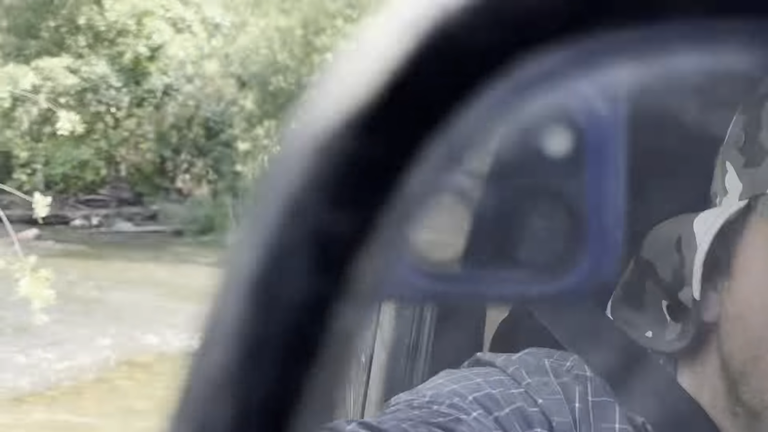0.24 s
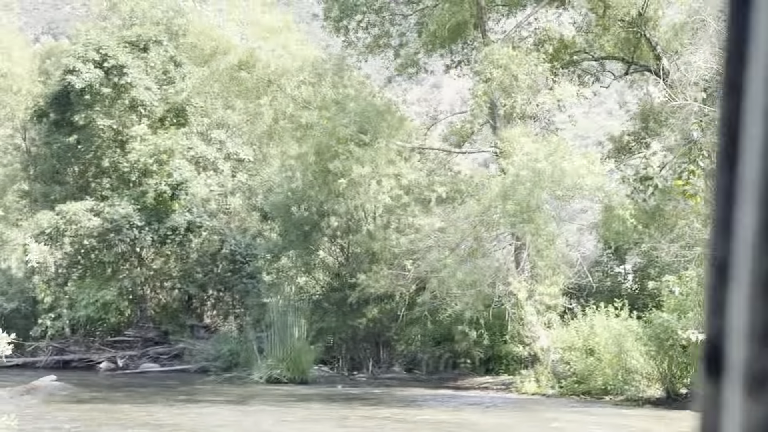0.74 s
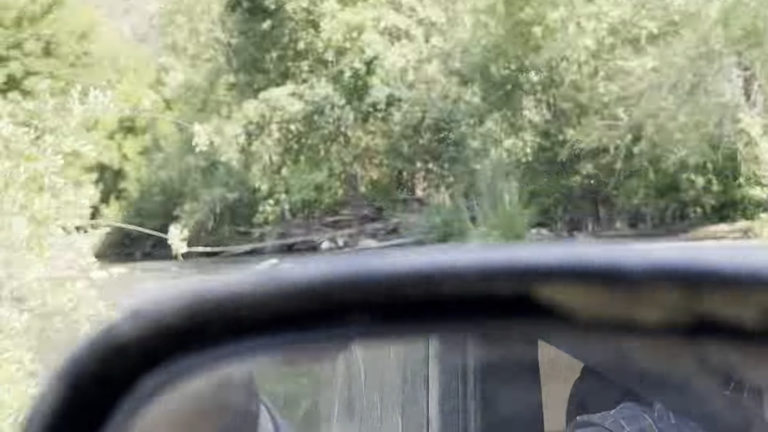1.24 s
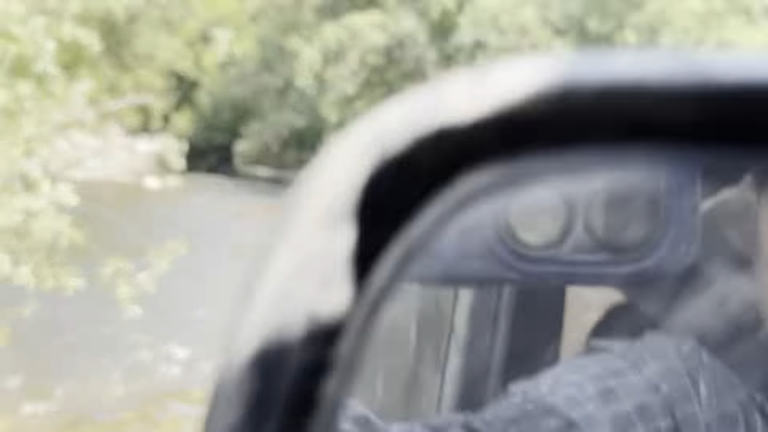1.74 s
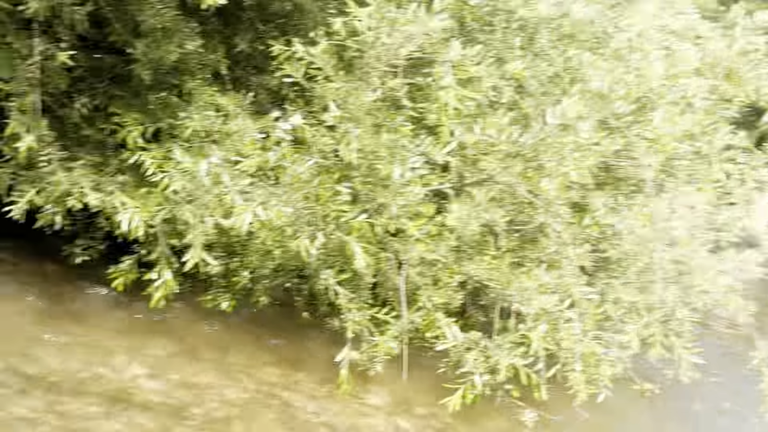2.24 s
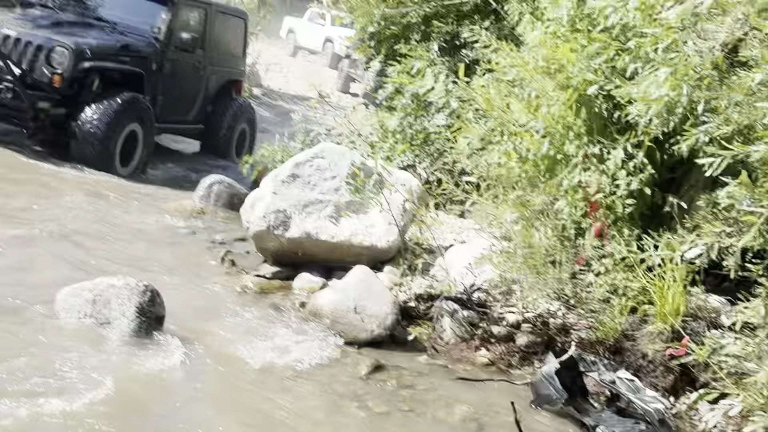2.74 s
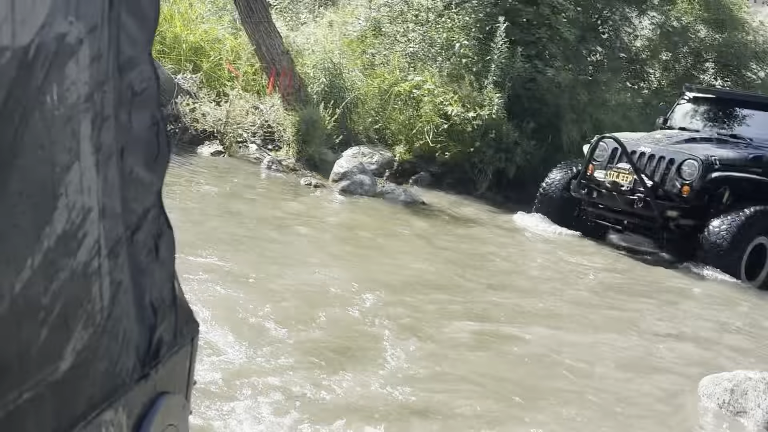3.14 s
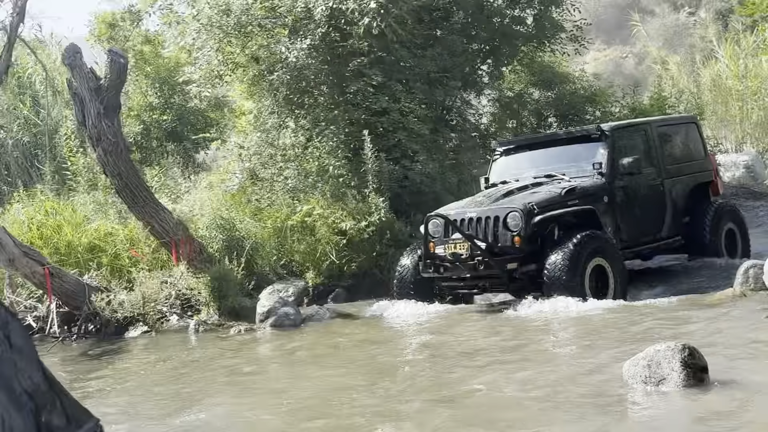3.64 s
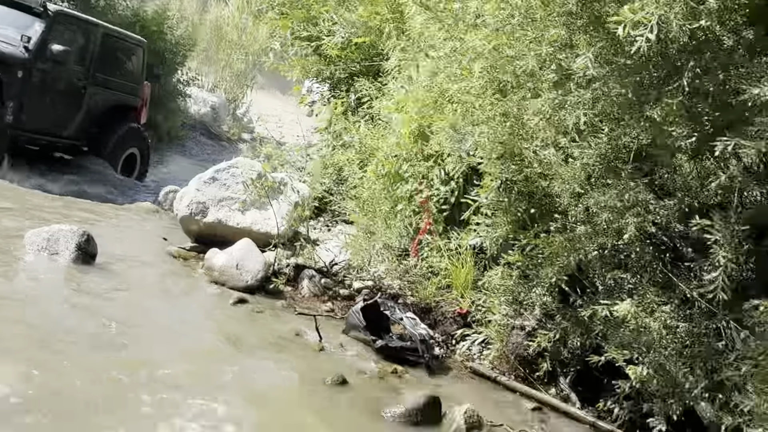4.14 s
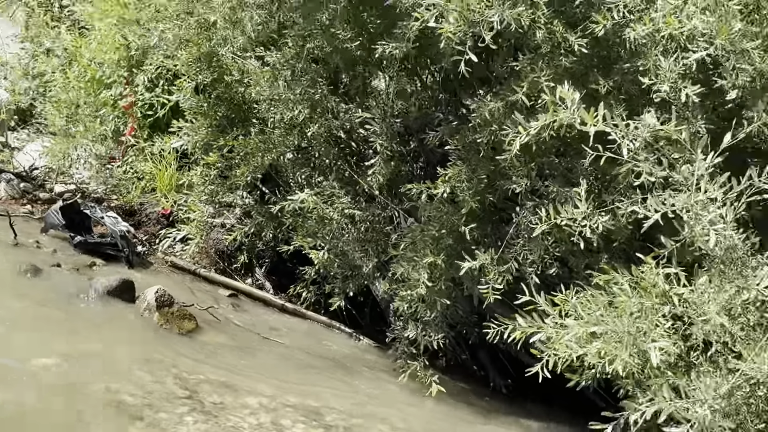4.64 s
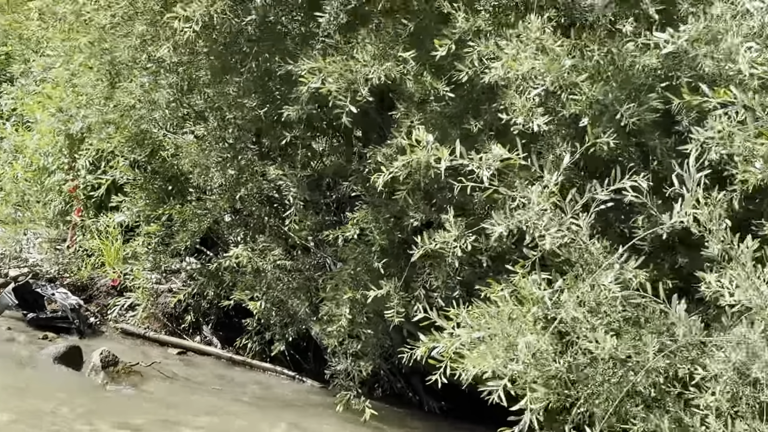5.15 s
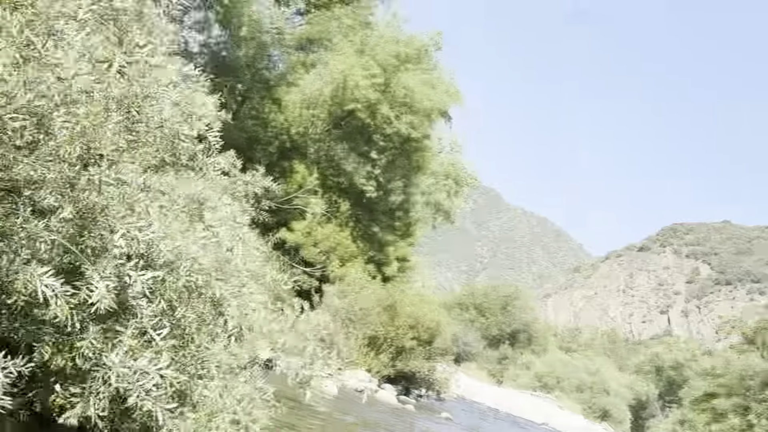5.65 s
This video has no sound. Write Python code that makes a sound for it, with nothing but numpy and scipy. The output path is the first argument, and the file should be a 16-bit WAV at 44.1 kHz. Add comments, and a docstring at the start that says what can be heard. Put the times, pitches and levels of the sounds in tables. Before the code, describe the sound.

Shallow river water rushes and splashes while an off-road vehicle growls and thumps, then a closer engine revs up and falls back.

```python
"""Shallow river, from the open window of a four-wheel-drive on rough ground.
The near V6 revs up and falls back: low exhaust orders boom in the cab, ragged firings rasp in the pipe.
Before that, a second vehicle growls into the ford, and the ground shakes and thumps the body.
Water runs throughout: ringing bubbles and drops over rush and hiss, with sloshes, splashes and plinks."""
import sys
import numpy as np
from scipy import signal
from scipy.fft import rfft, irfft
from scipy.io import wavfile

SR = 44100
rng = np.random.default_rng(int(sys.argv[2]) if len(sys.argv) > 2 else 0)


def file_out(sig):
    """Save sig as 16-bit WAV at sys.argv[1]."""
    # one column per channel
    cols = np.atleast_2d(sig).T
    # limit, then scale
    lim = np.clip(cols, -1, 1)
    pcm = np.round(lim * 32767).astype(np.int16)
    wavfile.write(sys.argv[1], SR, pcm)


N = 259308
TIME_S = np.arange(N) / SR
REF_PULSE_HZ = 39.3  # engine speed at which order levels are stated
CUTOFF_HZ = 15850

# near engine speed (time [s], pulse rate of one cylinder bank [Hz])
NEAR_SPEED = [(3.71, 18.8), (3.75, 19.4), (3.9, 28.4), (4.0, 32), (4.14, 35.9), (4.25, 38.4), (4.41, 39.8),
              (4.52, 41.9), (4.76, 40.3), (4.86, 39.4), (5.05, 38.3), (5.19, 35.7), (5.4, 31.8),
              (5.6, 31.5), (5.68, 34), (5.88, 31.6)]
# near throttle (time [s], opening [0-1])
NEAR_THROTTLE = [(3.7, .3), (3.82, 0.66), (4.06, 0.68), (4.15, 0.94), (4.28, 0.79), (4.45, 0.77),
                 (4.6, 0.55), (4.8, 0.37), (5.1, 0.41), (5.35, .15), (5.88, 0)]
# near boom (time [s], level [dB])
NEAR_BOOM_LEVEL = [(3.71, -10.5), (4.0, -15), (4.3, -14.5), (4.46, -18.5), (4.52, -22.5), (4.58, -16.5),
                   (4.76, -24), (4.86, -20.5), (5.2, -19), (5.45, -23), (5.7, -14), (5.88, -17)]
# near exhaust orders (multiple of pulse rate [-], full-throttle level [dB], speed slope [dB/octave])
NEAR_BOOM_ORDERS = [(2, -0.5, 0.5), (4, 1, -2), (6, 5.5, 22), (8, -1, -3.5)]
# cab resonances (frequency [Hz], gain [dB])
CAB_RESPONSE = [(38, -25), (50, -6), (60, -1), (72, -0.5), (84, -5), (110, -0.5), (132, 0.5), (160, -4),
                (190, -4.5), (222, -7), (234, -0.5), (246, 3), (262, -3.5), (300, -9.5), (340, -5.5)]
# near exhaust pipe (frequency [Hz], gain [dB])
NEAR_PIPE_RESPONSE = [(170, 3), (260, 15), (350, -3.5), (410, 1.5), (490, -3), (570, 4.5), (620, -3),
                      (680, -0.5), (780, -8), (900, -9.5), (1300, -15), (2500, -22)]

# second vehicle: crawl, two blips, ford (time [s], pulse rate of one cylinder bank [Hz], level [dB])
FORDING_RUN = [(0, 40.5, -22.5), (.3, 38, -22.5), (.4, 38.7, -33), (.6, 39, -27.5), (1.1, 34, -28.5),
               (1.6, 33.7, -25.5), (2.44, 35.7, -29), (2.55, 36.3, -23), (2.67, 40, -19.5),
               (2.76, 31.2, -21.5), (2.86, 33.4, -17), (2.98, 37.2, -14), (3.1, 41.1, -18),
               (3.22, 42.2, -15), (3.4, 40.6, -17), (3.55, 36.5, -19.5), (3.67, 37.2, -19), (3.74, 35, -17)]
# its exhaust orders (multiple of pulse rate [-], level [dB], speed slope [dB/octave])
FORDING_BOOM_ORDERS = [(2, 0.5, -2), (4, 0, -3), (6, -10.5, -4), (7, -2.5, -7)]
# its exhaust resonances (frequency [Hz], gain [dB])
FORDING_PIPE_RESPONSE = [(60, -13), (67, -20), (71, -0.5), (75, 1), (84, -5), (120, -5), (136, -4),
                         (147, -7), (157, 1.5), (167, 3.5), (200, -6), (232, -1.5), (256, -1), (280, -13.5),
                         (300, -9)]

# blows to the body (time [s], level [dB], contact cut-off [Hz])
BUMP_HITS = [(.730, -10, 500), (.862, 0, 650), (.870, -6, 400), (.918, 1, 547), (.996, -11, 150),
             (1.195, -9, 200), (1.993, -3.5, 546), (2.015, -12, 600), (2.079, -6.5, 700), (2.112, -5, 550),
             (2.256, -6.5, 300), (2.288, -4, 501), (2.300, 2, 750), (2.317, -3, 595), (2.338, -1, 650),
             (2.375, -8, 650), (2.401, -6, 620), (2.499, -4.5, 600), (3.387, -7, 300)]
# body modes (frequency [Hz], level [dB], t60 [s])
BODY_MODES = [(72.4, -18, 0.07), (140, -0.5, 0.075), (210, -2, 0.035), (277, 4.5, 0.023), (410, -1, 0.02),
              (533, -6, 0.018)]
# cab vibration (time [s], shake level [dB], panel drone level [dB])
RUMBLE_LEVELS = [(0, -23, -24.5), (.3, -20.5, -22.5), (.4, -29.5, -24.5), (.58, -20.5, -19),
                 (.8, -21, -20.5), (.98, -17.5, -20), (1.1, -23, -22), (1.62, -20, -21.5),
                 (1.8, -25, -22.5), (2.05, -21, -21), (2.3, -16.5, -16), (2.5, -18.5, -19.5),
                 (2.95, -21.5, -19.5), (3.17, -14, -19), (3.42, -23, -20), (3.65, -32, -26.5),
                 (3.92, -19, -17), (4.35, -25.5, -32), (4.8, -31.5, -32), (5.3, -24.5, -24.5),
                 (5.88, -28.5, -28.5)]
# deep shake (frequency [Hz], spectral density [dB])
SHAKE_SPECTRUM = [(22, -26), (38, -10.5), (53, -1.5), (80, 2.5), (105, -2.5), (125, -7)]
# panel drone (frequency [Hz], spectral density [dB])
DRONE_SPECTRUM = [(105, -11.5), (140, 1), (165, -0.5), (195, -4.5), (260, -7), (340, -15.5), (500, -26.5),
                  (800, -41)]

# river flow (time [s], gurgle level [dB], spray level [dB])
FLOW_LEVELS = [(0, -33.5, -39.5), (.85, -33.5, -40.5), (1.0, -32, -37), (1.35, -33, -41),
               (1.62, -30.5, -35), (1.85, -32, -38.5), (2.2, -32, -34.5), (2.65, -31.5, -36),
               (3.05, -30.5, -34.5), (3.4, -32, -36.5), (3.72, -31, -34.5), (3.9, -31.5, -38),
               (4.15, -31, -39), (4.6, -40, -44.5), (5.1, -37.5, -43.5), (5.45, -35.5, -40.5),
               (5.88, -40, -47)]
# rush and bubbles (frequency [Hz], spectral density [dB])
GURGLE_SPECTRUM = [(200, 2.5), (330, 7.5), (500, 5.5), (750, 2.5), (1100, 0.5), (1600, -5), (2400, -9.5),
                   (3400, -15.5), (5000, -28)]
# hiss and drops (frequency [Hz], spectral density [dB])
SPRAY_SPECTRUM = [(1500, -3), (2800, -2), (4300, -3), (6000, 0), (7500, 1), (10000, 2), (12500, -4),
                  (15500, 1.5), (19000, 3.5)]
# waves at the tyres (time [s], river swell [dB], extra low-gurgle swell [dB], ebb time [s])
SLOSH_WAVES = [(.06, 2.5, 0.5, 0.029), (.18, 1.5, 0, .05), (.345, 2.5, 5.5, 0.054), (.425, 3.5, 5.5, 0.056),
               (1.08, 0.5, -6, .04), (1.16, 2, -4, 0.026), (1.72, -0.5, 5.5, 0.19), (2.33, -1, 3, 0.17),
               (2.41, 2, 3, 0.058), (2.86, 1.5, 0.5, 0.062), (3.1, 3, 0, 0.043), (3.5, 1, -9, 0.022),
               (3.75, 3, -4, .025), (4.75, 2, 6, 0.025), (4.96, 5, -4, 0.043), (5.53, 1.5, 3, 0.04),
               (5.62, 1, 3, .03)]
# close splashes (time [s], level [dB], band frequency [Hz], t60 [s])
SPLASH_BURSTS = [(.1586, -20.5, 8100, 0.027), (.180, -26, 7000, 0.058), (0.349, -43, 2000, .12),
                 (.452, -28, 4000, .04), (.967, -18.5, 9000, 0.022), (0.9934, -13, 11000, .008),
                 (1.437, -32, 3300, 0.059), (1.859, -20.5, 9000, 0.027), (2.151, -21, 7000, .04),
                 (3.09, -23, 2199, 0.17), (3.474, -21, 7000, 0.037), (3.7265, -28, 6000, 0.061),
                 (4.36, -31, 7000, .03), (4.6015, -35, 5990, 0.033), (4.6644, -29, 5995, 0.065),
                 (4.957, -38, 6020, 0.11), (5.178, -28.5, 7000, 0.022), (5.331, -28, 5000, .06),
                 (5.433, -30, 7494, .03), (5.531, -28, 2504, 0.045)]
# single ringing drops (time [s], level [dB], start pitch [Hz], t60 [s])
PLINK_DROPS = [(.125, -29, 2620, .05), (.408, -25, 2640, 0.047), (.485, -29, 12300, .06),
               (.868, -37, 3900, .12), (1.160, -31, 4500, 0.062), (1.436, -31, 3150, .11),
               (1.740, -15.5, 907, 0.056), (3.088, -31, 2050, 0.032), (4.505, -36, 3875, .04),
               (4.968, -26, 1230, 0.055), (5.706, -29, 1422, .05)]

# left-right likeness of noise beds (frequency [Hz], correlation [0-1])
STEREO_CORRELATION = [(60, 0.96), (250, 0.81), (500, 0.67), (1100, 0.57), (2200, 1), (3100, 0.86),
                      (4200, 1), (16000, 0.99)]
# right-channel treble phase (frequency [Hz], lag [turns])
RIGHT_PHASE_LAG = [(7900, 0), (8100, -.33), (8350, -.49), (9500, -.48), (11000, 0), (11650, 0),
                   (11800, .13), (13400, .5), (15100, .88), (15250, 1)]


def near_engine(odd_db=-20, open_rasp_db=-17.5, shut_loss_db=24, shut_dulling_db_per_oct=6):
    """V6: boom plus pipe-coloured firing harmonics, ragged and hissing under load."""
    pulse_hz, = curves(NEAR_SPEED)
    boom_db, = curves(NEAR_BOOM_LEVEL)
    throttle, = curves(NEAR_THROTTLE)
    shut = 1 - throttle
    tone, phase = boom(pulse_hz, boom_db + 1.1, NEAR_BOOM_ORDERS, CAB_RESPONSE, jitter=.0051,
                       waver_db=1.3, dulling_db_per_oct=shut_dulling_db_per_oct * shut)
    rough = .18 + .38 * throttle ** 2
    edge_hz = 505 + 650 * throttle ** 3
    rasp, power = 0, 0
    for k in range(round(NEAR_BOOM_ORDERS[-1][0]) + 1, 36):
        hz = k * pulse_hz
        imbalance_db = k % 2 * odd_db * (1 - rough)  # odd orders: the two banks fire unequally
        gain = from_db(at_hz(NEAR_PIPE_RESPONSE, hz) + imbalance_db) / np.sqrt(1 + (hz / edge_hz) ** 9)
        smear_rad = rng.uniform(0, 2 * np.pi)  # silencer reflections
        rasp += gain * np.cos(k * phase - smear_rad + 1.1 * rough * drift(6.7))
        power += gain ** 2 / 2
    rasp = rasp / np.sqrt(power) * (1 + .5 * rough * drift(54))
    gas = butter(rng.standard_normal(N), [500, 830], "band") * (1 + .21 * np.cos(2 * phase))
    rasp += 1.06 * rough * unit_rms(gas)
    rasp *= from_db(open_rasp_db - shut_loss_db * shut)
    return (tone + rasp * from_db([[.5], [-.5]])) * gate(NEAR_SPEED, fade_s=.06)


def fording_engine(flutter=.33):
    """Second vehicle: exhaust growl, firings of varying strength."""
    pulse_hz, level_db = curves(FORDING_RUN)
    tone, _ = boom(pulse_hz, level_db - 1.5, FORDING_BOOM_ORDERS, FORDING_PIPE_RESPONSE,
                   jitter=.008, waver_db=1.8)
    return tone * gate(FORDING_RUN, fade_s=.086) * (1 + flutter * drift(35))


def boom(pulse_hz, level_db, orders, response, jitter, waver_db, dulling_db_per_oct=0):
    """Low exhaust orders of an uneven crank sweep through resonances. Returns tone, phase [rad]."""
    phase = 2 * np.pi * np.cumsum(pulse_hz * (1 + jitter * drift(23.4))) / SR
    speed_oct = np.log2(pulse_hz / REF_PULSE_HZ)
    tone = 0
    for multiple, db, db_per_oct in orders:
        k = round(multiple)
        gain_db = level_db + db + db_per_oct * speed_oct + at_hz(response, k * pulse_hz)
        gain_db -= dulling_db_per_oct * np.log2(k / 2)
        tone -= from_db(gain_db + waver_db * drift(29)) * np.cos(k * phase)
    return np.sqrt(2) * tone, phase


def bumps(crunch_db=-13, crunch_t60_s=.14):
    """Soft blows ring the body modes; loose stones crunch after each."""
    out, age_s = np.zeros(N), TIME_S[:SR // 4]
    for time_s, db, contact_hz in BUMP_HITS:
        blow = butter(signal.unit_impulse(len(age_s)), [70, contact_hz], "band")
        thud = sum(from_db(mode_db + rng.normal(0, .77)) * ring(blow, hz, t60_s)
                   for hz, mode_db, t60_s in BODY_MODES)
        stones = butter(rng.standard_normal(len(age_s)), [contact_hz / 4, contact_hz * .584], "band")
        crunch = from_db(crunch_db) * unit_rms(stones) * decay(age_s, crunch_t60_s)
        add_at(out, time_s, -from_db(db) * (thud / np.abs(thud).max() + crunch))
    return out


def body_rumble():
    """Tyres on stones and the driveline shake the cab; its panels drone."""
    shake_db, drone_db = curves(RUMBLE_LEVELS)
    shake = from_db(shake_db + .5) * banded_noise(SHAKE_SPECTRUM, flicker_db=.6, flicker_hz=13)
    drone = from_db(drone_db + .5) * banded_noise(DRONE_SPECTRUM, flicker_db=.5, flicker_hz=24)
    return (shake + drone) * from_db([[.2], [-.2]])


def river(surge_db_per_db=.36):
    """Bubbles over a low rush; fine drops over white-water hiss."""
    gurgle_db, spray_db = curves(FLOW_LEVELS)
    swell_db, low_swell_db = sloshing()
    rush = from_db(4.5) * banded_noise(GURGLE_SPECTRUM, flicker_db=1.28, flicker_hz=16.7)
    bubbles = grains(GURGLE_SPECTRUM, 384, 4280, per_s=1200, t60_cycles=24, pan_db=2)
    gurgle = rush + from_db(.5) * bubbles
    # large, low bubbles follow flow and waves
    surge_db = surge_db_per_db * (gurgle_db - gurgle_db.mean()) + low_swell_db
    gurgle += (from_db(surge_db) - 1) * butter(gurgle, 600, "low", order=1)
    hiss = banded_noise(SPRAY_SPECTRUM, flicker_db=1, flicker_hz=34) * from_db(4.5 + .98 * drift(45))
    drops = grains(SPRAY_SPECTRUM, 2520, CUTOFF_HZ, per_s=3800, t60_cycles=11.6, pan_db=1.9)
    spray = hiss + from_db(-1) * drops
    return from_db(swell_db) * (from_db(gurgle_db) * gurgle + from_db(spray_db) * spray)


def grains(spectrum, low_hz, high_hz, per_s, t60_cycles, pan_db, size_db=3, pitches=28):
    """Bubbles or drops born in clumps, each ringing at one pitch. Stereo, rms 1."""
    births = np.flatnonzero(rng.random(N) < per_s * from_db(4 * drift(14)) / SR)
    sizes = from_db(size_db * np.minimum(rng.exponential(1, N), 4.5)) * rng.choice([-1, 1], N)
    pitch_index = rng.integers(0, pitches, N)
    out = np.zeros((2, N))
    for k, hz in enumerate(np.geomspace(low_hz, high_hz, pitches)):
        onsets = births[pitch_index[births] == k]
        clicks = np.zeros(N)
        clicks[onsets] = sizes[onsets]
        pan = from_db(pan_db * rng.normal() * np.array([[1], [-1]]))
        out += pan * hz * from_db(at_hz(spectrum, hz)) * ring(clicks, hz, t60_cycles / hz)
    return unit_rms(out)


def sloshing(rise_ratio=.47):
    """Waves build fast, then ebb. Returns swell [dB] of the river and of its low gurgle."""
    swell_db, low_swell_db = 0, 0
    for time_s, db, extra_db, ebb_s in SLOSH_WAVES:
        width_s = np.where(TIME_S < time_s, rise_ratio * ebb_s, ebb_s)
        wave = np.exp(-((TIME_S - time_s) / width_s) ** 2)
        swell_db += db * wave
        low_swell_db += extra_db * wave
    return swell_db, low_swell_db


def splashes():
    """Close spatter: short bursts of spiky noise."""
    out, age_s = np.zeros(N), TIME_S[:SR // 4]
    for time_s, db, hz, t60_s in SPLASH_BURSTS:
        spatter = butter(rng.laplace(size=len(age_s)), [hz / 1.48, hz * 1.22], "band", order=1)
        add_at(out, time_s, from_db(db - 2) * unit_rms(spatter) * decay(age_s, t60_s))
    return out


def plinks(glide_per_s=.18, attack_s=.00077):
    """Trapped bubbles ring, rising slightly in pitch."""
    out, age_s = np.zeros(N), TIME_S[:SR // 8]
    for time_s, db, hz, t60_s in PLINK_DROPS:
        envelope = (1 - np.exp(-age_s / attack_s)) * decay(age_s, t60_s)
        tone = np.sin(2 * np.pi * hz * age_s * (1 + glide_per_s * age_s))
        add_at(out, time_s, from_db(db) * envelope * tone)
    return out


def echoes(x, echo_db, count=9):
    """Dull side reflections off the river bank and the vehicles."""
    lags = (rng.uniform(.00624, .09, count) * SR).astype(int)
    dull = butter(x.mean(axis=0), 1400, "low")
    delayed = np.array([np.pad(dull, (lag, 0))[:N] for lag in lags])
    gains = from_db(echo_db) * unit_rms(rng.normal(size=count))
    return gains @ delayed * np.array([[1], [-1]])


def banded_noise(spectrum, flicker_db, flicker_hz):
    """Stereo noise; each band has its own flicker and left-right correlation. Rms 1."""
    top_hz = min(spectrum[-1][0], CUTOFF_HZ + 2000)
    edges_hz = np.geomspace(spectrum[0][0], top_hz, len(spectrum) + 4)
    white = rng.standard_normal((2, 2, N))
    out = 0
    for k, (low_hz, high_hz) in enumerate(zip(edges_hz, edges_hz[1:])):
        mid, side = butter(white[k % 2], [low_hz, high_hz], "band")
        hz = np.sqrt(low_hz * high_hz)
        correlation = at_hz(STEREO_CORRELATION, hz)
        gain = from_db(at_hz(spectrum, hz) + flicker_db * drift(flicker_hz))
        out += gain * (np.sqrt(1 + correlation) * mid + np.sqrt(1 - correlation) * side * [[1], [-1]])
    return unit_rms(out)


def drift(corner_hz):
    """Slow random wander, rms 1."""
    step, settle = 20, 2000
    pole = np.exp(-2 * np.pi * corner_hz * step / SR)
    white = rng.standard_normal(N // step + settle + 2)
    slow = signal.lfilter([1], [1, -2 * pole, pole * pole], white)[settle:]
    return np.interp(np.arange(N) / step, np.arange(len(slow)), unit_rms(slow))


def ring(x, hz, t60_s):
    """Resonator: unit click in, decaying unit sine out."""
    radius, angle = from_db(-60 / (t60_s * SR)), 2 * np.pi * hz / SR
    return signal.lfilter([0, np.sin(angle)], [1, -2 * radius * np.cos(angle), radius ** 2], x + 1e-18)


def butter(x, hz, kind, order=2):
    """Butterworth filter."""
    sections = signal.butter(order, np.clip(hz, 10, .48 * SR), kind, fs=SR, output="sos")
    return signal.sosfilt(sections, x + 1e-18)


def gate(rows, fade_s):
    """Open over a table's time span."""
    fade_in = np.clip((TIME_S - rows[0][0]) / fade_s + .5, 0, 1)
    fade_out = np.clip((rows[-1][0] - TIME_S) / fade_s + 1, 0, 1)
    return fade_in * fade_out


def decay(age_s, t60_s):
    """Exponential fade."""
    return np.exp(-np.log(1000) * age_s / t60_s)


def add_at(out, time_s, x):
    """Mix x into out."""
    start = round(time_s * SR)
    out[start:start + len(x)] += x


def curves(rows):
    """Value columns of a time table, per sample."""
    times_s, *columns = np.transpose(rows)
    return [np.interp(TIME_S, times_s, column) for column in columns]


def at_hz(rows, hz):
    """Table value on a log-frequency axis."""
    table_hz, values = np.transpose(rows)
    return np.interp(np.log(hz), np.log(table_hz), values)


def from_db(db):
    """Decibels to gain."""
    return 10 ** (np.asarray(db) / 20)


def unit_rms(x):
    """Scale to rms 1."""
    return x / np.sqrt(np.mean(x ** 2) + 1e-20)


def scene():
    """Vehicles, their echoes, water."""
    vehicles = near_engine() + fording_engine() + bumps()
    return vehicles + echoes(vehicles, echo_db=-30) + body_rumble() + river() + splashes() + plinks()


def record(dry):
    """Subsonic cut, soft clip, right-channel treble phase lag, top cut."""
    lean = butter(dry, 13, "high")
    clipped = lean / (1 + lean ** 6) ** (1 / 6)
    hz = np.arange(N // 2 + 1) * SR / N
    lag_turns = np.interp(hz, *np.transpose(RIGHT_PHASE_LAG))
    phase_shift = np.exp(-2j * np.pi * lag_turns * [[0], [1]])
    low_pass = np.clip((CUTOFF_HZ - hz) / 150, 0, 1)
    return irfft(rfft(clipped) * phase_shift * low_pass, N)


dry = scene()
out = record(dry)
file_out(out)
```